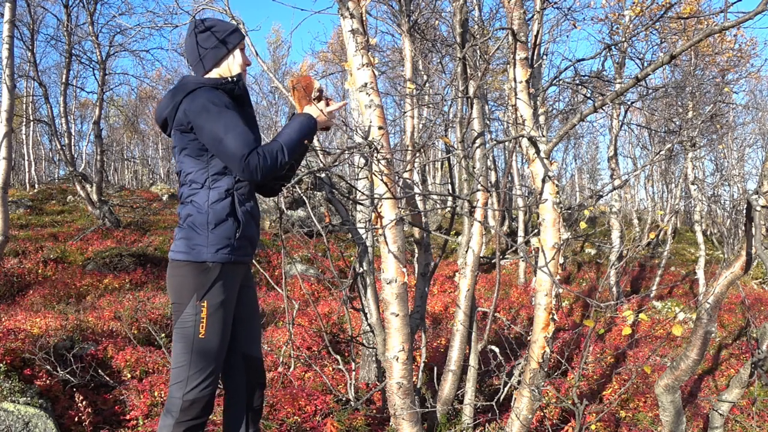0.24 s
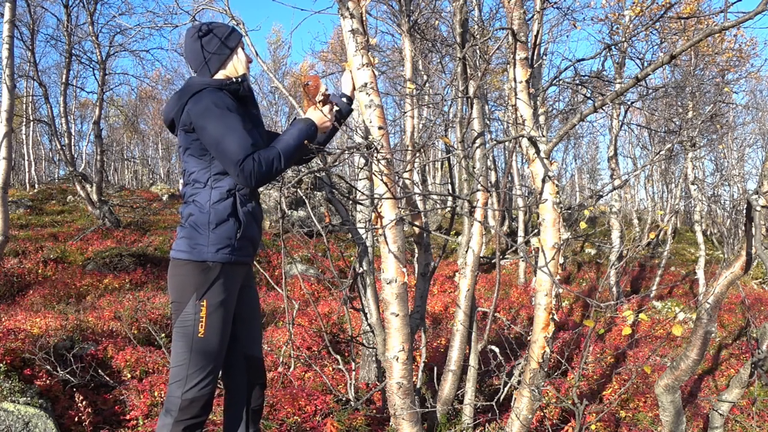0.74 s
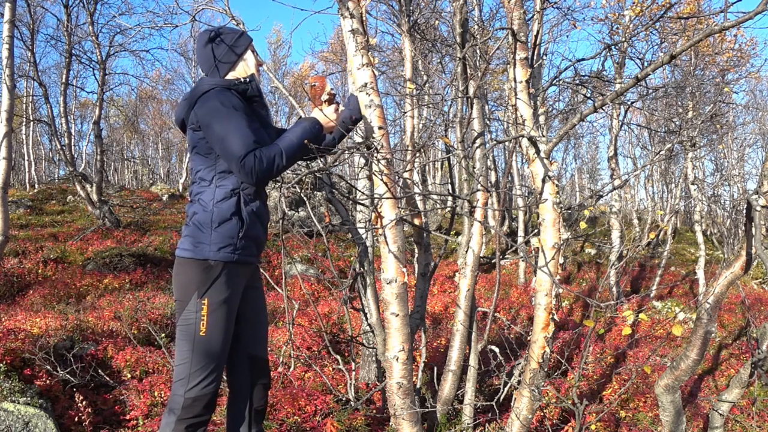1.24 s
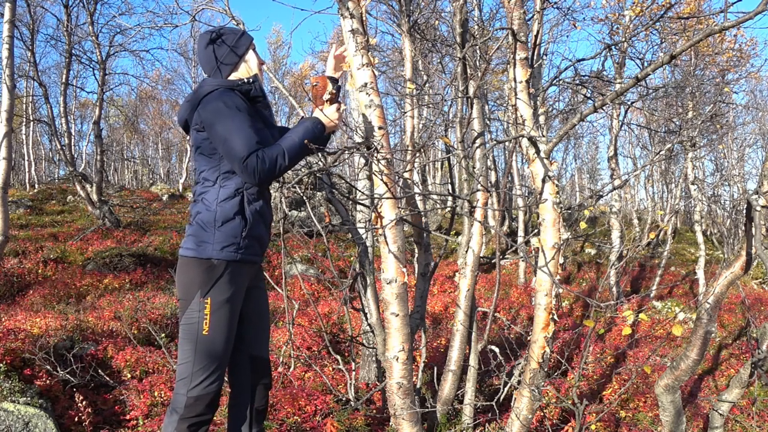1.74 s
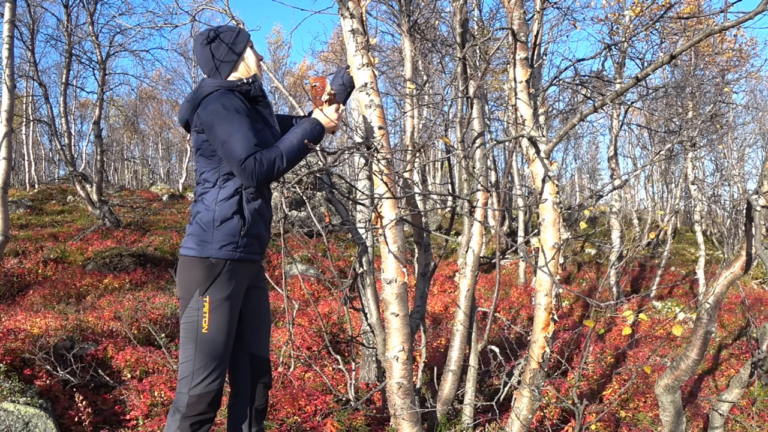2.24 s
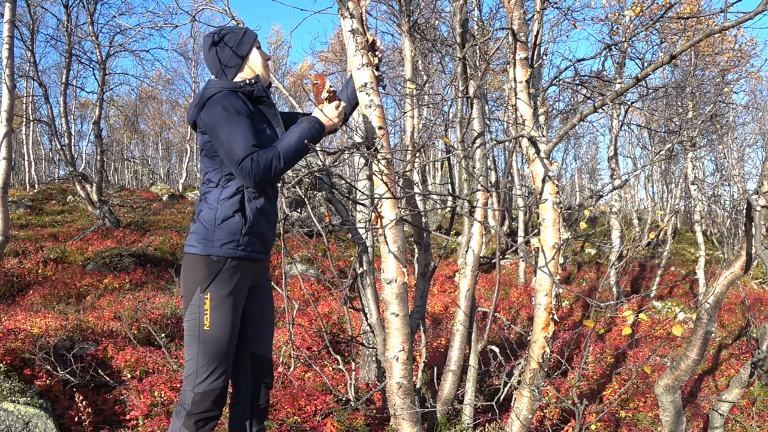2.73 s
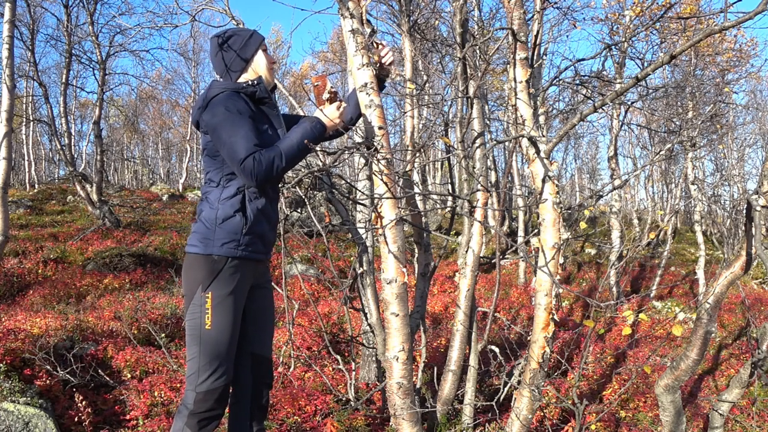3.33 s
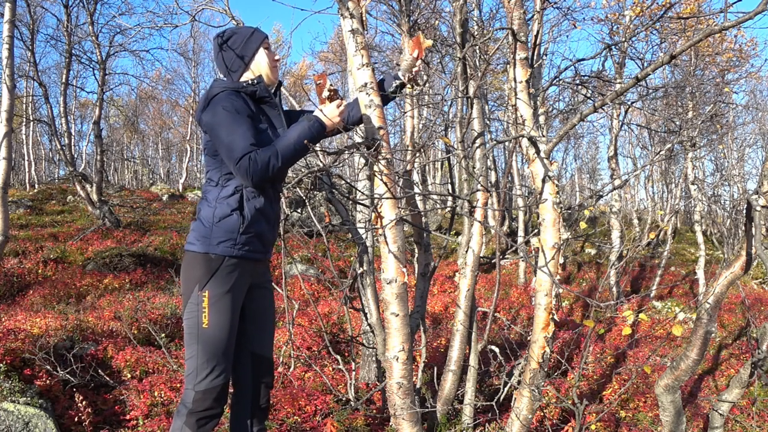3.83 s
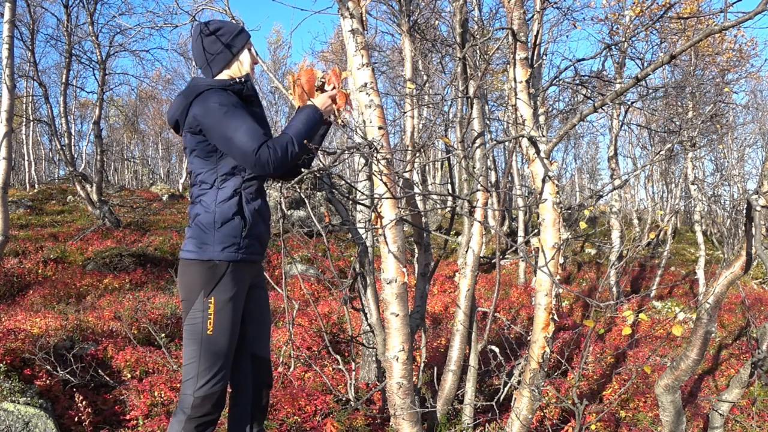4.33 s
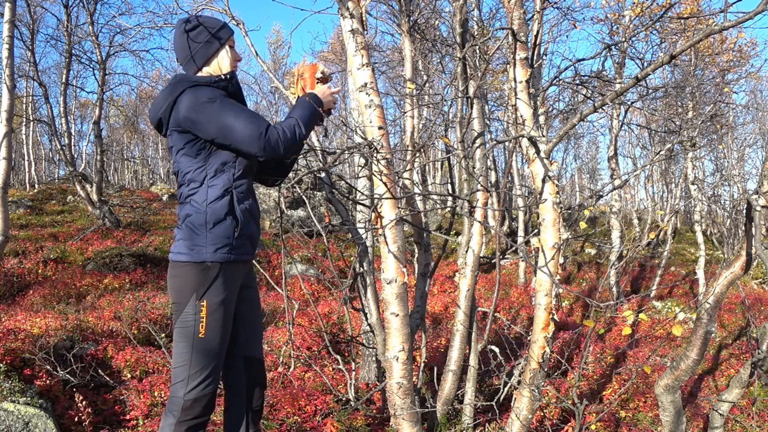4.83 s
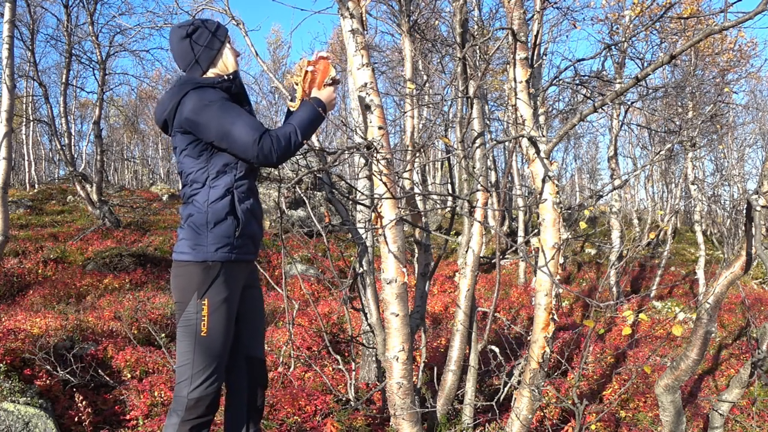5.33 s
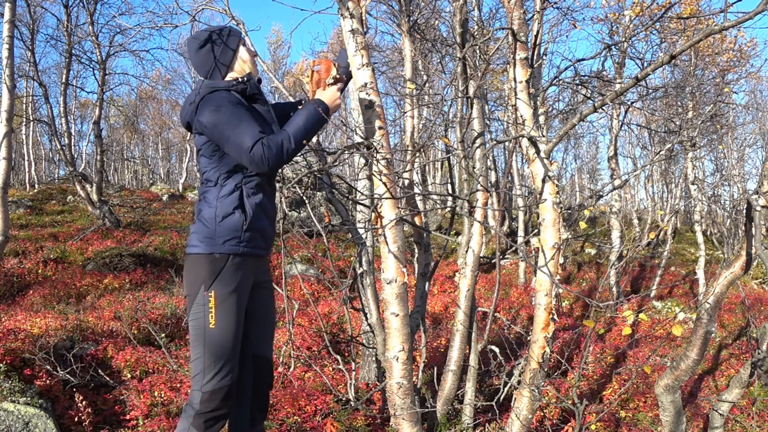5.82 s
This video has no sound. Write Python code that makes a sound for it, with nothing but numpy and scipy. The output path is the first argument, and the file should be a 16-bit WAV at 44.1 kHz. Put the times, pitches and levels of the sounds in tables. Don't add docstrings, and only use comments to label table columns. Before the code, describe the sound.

Brittle snaps and short tearing rips of thin bark, with woody creaks and faint knocks, a few metres away in calm open woodland.

```python
import sys
import numpy as np
from scipy import signal
from scipy.fft import rfft, irfft, next_fast_len
from scipy.io import wavfile
from scipy.ndimage import uniform_filter1d, map_coordinates

SR = 44100
rng = np.random.default_rng(int(sys.argv[2]) if len(sys.argv) > 2 else 0)


def invert_db(level):
    return 10 ** (np.asarray(level, dtype=float) / 20)


def dump_mix(stems):
    frames = np.atleast_2d(stems).T
    limited = np.clip(frames, -1, 1)
    pcm = np.round(limited * 32767).astype(np.int16)
    wavfile.write(sys.argv[1], SR, pcm)


N = 267687

# (frequency [Hz], level [dB per Hz])
FOREST_COLOUR = [(71, -5), (120, -3.5), (157, 0), (1070, 0.5), (2070, -7), (5300, -16), (6200, -15),
                 (7000, -19), (10600, -27), (13900, -39), (15800, -37)]
# (frequency [Hz], level [dB per Hz])
RUMBLE_COLOUR = [(12, -2), (25, 0), (50, 4.5), (85, 0), (125, -12.5), (350, -100)]
# (frequency [Hz], left-right likeness [-1 to 1])
EAR_LIKENESS = [(30, 1), (85, 1), (130, 0.23), (290, 0.23), (640, -0.023), (1400, -0.47), (6800, -0.47)]
# (frequency [Hz], level [dB])
SHEET_COLOUR = [(3600, -27), (4800, -5.5), (6300, 2.5), (7600, -3), (9000, -11), (12000, -38)]
# (frequency [Hz], level [dB])
CURL_COLOUR = [(1100, -19.5), (2000, -9.5), (3200, -3), (4300, 1.5), (5000, -4.5), (6500, -54),
               (11000, -53)]
# (frequency [Hz], level [dB])
EDGE_COLOUR = [(6500, -9.5), (9000, 2.5), (10500, 6.5), (12000, -2), (13800, -3), (15500, -18),
               (16100, -38)]
# (frequency [Hz], level [dB])
TRUNK_COLOUR = [(70, -41), (200, -14.5), (650, -2), (1150, 1), (1800, -1.5), (3000, -43), (8000, -59)]
# (frequency [Hz], level [dB])
RUB_COLOUR = [(350, -21.5), (1100, 7.5), (2200, 8), (3600, 8), (9000, -107)]
# (frequency [Hz], level [dB])
SLAB_COLOUR = [(900, -35), (1500, -6), (2200, 0), (3000, -5), (4200, -40)]
# (centre [Hz], width [Hz], level [dB])
LIMB_MODES = [(1030, 980, -5.5), (675, 193, 16.5), (1140, 106, 13.5)]

# (start [s], length [s], rustle [dB], glove over the rustle [dB])
MOVES = [(0.011, 0.44, -55, -6.5), (0.226, 0.18, -48.5, -7), (0.7, 0.38, -60, -14), (1.387, 0.35, -62, -22),
         (1.887, 0.49, -60, -8.5), (2.423, 0.27, -60, -4), (2.666, 0.17, -54.5, -6.5),
         (2.786, 0.24, -55.5, -12.5), (3.027, 0.7, -58.5, -25), (3.58, 0.55, -62.5, -26),
         (4.198, 0.77, -58.5, -4.5), (4.302, 0.27, -64.5, 5.5), (4.838, 0.48, -56.5, -6.5),
         (5.003, 0.19, -51.5, -7.5), (5.11, 0.14, -57, -21), (5.45, 0.66, -66.5, -6), (5.68, 0.28, -63, -5)]
# (start [s], length [s], rustle [dB], change along the pull [dB])
RIPS = [
    (0.972, 0.15, -49.5, -15),
    (1.239, 0.19, -48.5, -17),
    (2.35, 0.12, -41.5, 2.5),
    (2.562, 0.069, -70, -10),
    (3.231, 0.15, -59, 11),
    (3.384, 0.264, -44.5, -8),
    (4.805, 0.05, -43.5, -6),
    (5.939, 0.059, -38, -23),
]

# (time [s], sheet [dB], curl over the sheet [dB])
DEEP = [(.327, -44, -2), (1.0035, -33, -3), (1.014, -34.5, -9), (1.0435, -39, 7), (1.299, -34, -3),
        (1.357, -30, -1), (2.462, -38, 2), (2.568, -34, 2.5), (2.594, -29, -6), (2.612, -30.5, -7),
        (3.076, -36, -6), (3.24, -28, -17), (3.3725, -40, 0), (3.343, -41.5, 9), (3.4255, -29.5, -1),
        (3.443, -37, 4), (3.53, -21.5, -3), (5.153, -38, 2), (5.691, -37.5, -1), (5.9735, -39, 5),
        (5.979, -33.5, 5.5), (6.0305, -50, 3)]
# (time [s], sheet [dB], curl over the sheet [dB], extra trunk [dB], extra edge [dB])
TORN = [(.054, -39, 3.5, 2, -6), (.142, -48, 8, 0, 0), (.981, -19, -7.5, -1.5, 2.5),
        (1.2526, -13.5, -4.5, 1, -2), (2.116, -32, -1, -1.5, 2), (2.379, -39, 9, 0, 3),
        (2.4017, -14.5, -8, -3, -5), (2.412, -29, 7, -6, 0), (2.432, -20, -2.5, 1.5, 2),
        (2.449, -30, -2, 5, 4), (2.476, -38, -2, 2, 5), (2.603, -29, 3.5, 0, 7),
        (3.2522, -17.5, -1, 2, 5.5), (3.391, -24, -2, 0, 1), (3.3966, -16, 2.5, -1.5, 2),
        (3.4055, -23, 2.5, 3, 0), (3.412, -27.5, 2, -4, 6), (3.494, -31.5, 2, -1, -3),
        (3.557, -33, -3, 3, 0), (3.606, -33.5, -6, 2, 1), (4.198, -37.5, 3.5, 2.5, 1),
        (5.9327, -28, 3.5, 5, -2), (5.937, -23.5, -6, -10, 0), (6.005, -36, 0, -4, 0),
        (6.0545, -23, -5, 4, 0)]
# (time [s], sheet [dB], curl over the sheet [dB])
LOOSE = [(.088, -37.5, 2), (.215, -43, -5), (.868, -39.5, -7), (.886, -43.5, -4), (1.028, -30.5, -2),
         (2.3513, -32, 0.5), (2.361, -30, 6), (2.368, -30, 2), (3.223, -31, -5), (3.4685, -26, 1.5),
         (3.52, -30, -5), (3.553, -29.5, -8), (3.787, -37, -7), (3.967, -38, 3.5), (4.01, -40, -1),
         (4.811, -35, -17), (4.82, -28.5, -11), (4.894, -33.5, -4), (4.914, -37, -3), (4.93, -31, -6),
         (4.9505, -59, 5), (5.31, -38.5, -12), (5.323, -36, -11), (5.995, -44, -8), (6.0115, -40, 2)]
# (time [s], sheet [dB], curl over the sheet [dB])
FIBRES = [(.169, -49, 9), (.318, -49.5, 12), (1.202, -40, -8), (1.488, -48, -21), (1.563, -38.5, -2),
          (1.603, -42.5, -5), (1.9265, -60.5, 18.5), (2.018, -41.5, -4.5), (2.07, -47.5, 4),
          (2.165, -46, 5.5), (2.216, -43, 6), (2.54, -41, 0), (2.7345, -45, 3), (2.755, -42.5, -2),
          (2.903, -48, 2), (2.976, -39.5, -4.5), (3.016, -43, 1), (3.16, -52, 12), (3.186, -41, -6),
          (3.839, -45, 3), (3.9345, -46, 6), (4.179, -43, -4), (4.221, -47, 9), (4.364, -56, 0),
          (4.475, -47, -3), (5.1, -44, 4), (5.238, -45, 2.5), (5.4915, -46.5, -4), (5.706, -54, 14),
          (5.764, -59.5, 18)]
# (time [s], sheet [dB], curl over the sheet [dB], extra trunk [dB], extra edge [dB])
BRITTLE = [(.372, -34.5, -18, 2, 0), (2.4165, -28, 2, 12, 3), (2.4215, -27, 3.5, 3, 7),
           (2.4415, -27, 0, 3, 1), (2.5764, -23.5, -7, -6, -3), (3.4655, -28, -8, 4, 3),
           (3.816, -34.5, -1, -11, 2), (3.8225, -34.5, 1, -7, 3), (5.9493, -28, -2, 0, 8),
           (5.8215, -42, 0, 0, 3), (5.8326, -21.5, -2.5, -3, -5), (5.8626, -30, 2, -2, 8),
           (6.0625, -18.5, -6, 6, -4)]
# (time [s], sheet [dB], curl over the sheet [dB])
TOUGH = [(.221, -35.5, -2), (.288, -43, .6), (.42, -52, 1), (.933, -37.5, -1.5), (1.323, -25, -3),
         (1.352, -31, -0.5), (1.81, -51, 5), (1.848, -47.5, -2), (2.101, -37, -1), (2.895, -39.5, -10),
         (3.232, -21, -3), (3.579, -37.5, 2), (3.597, -29.5, -2.5), (3.953, -33.5, 1), (4.823, -32, -18),
         (4.83, -41, -12), (6.025, -31.5, -0.5), (4.003, -36, 4), (4.474, -38, -4), (4.641, -36, -1),
         (4.799, -33, -1.5), (4.887, -37, 0), (5.049, -39, 0.5), (5.088, -39, -0.5), (5.178, -55, -8)]
# (time [s], sheet [dB], curl over the sheet [dB], extra trunk [dB], extra edge [dB])
SPLINTERS = [
    (3.041, -35.5, -2.5, 0, -1),
    (3.311, -33.5, 7, 2, -1),
    (3.722, -35.5, -1, 1, -7),
]
# (time [s], sheet [dB], curl over the sheet [dB])
SCUFFS = [(2.676, -51, -1), (4.36, -46.5, -2), (4.41, -47, -3), (4.452, -43, 0.5), (4.508, -47.5, 7),
          (5.148, -52, 9)]
# (time [s], sheet [dB], curl over the sheet [dB])
THREADS = [(.008, -49, 3), (.455, -55.5, 6), (1.069, -47, -2), (2.289, -48, 7.5), (2.304, -56, 6),
           (2.319, -50, -9), (2.437, -37, -4), (3.109, -53, 3), (3.123, -55, -6), (3.133, -53, 0),
           (3.149, -51, -10), (3.508, -39, -9), (3.561, -38, 0), (3.616, -36.5, -10), (3.709, -55, 1),
           (3.769, -43.5, -13), (3.851, -42, -2), (4.393, -56, -4), (4.585, -54, -9), (5.51, -45, -14),
           (5.617, -49, 3), (5.177, -44, -9), (5.941, -39, -4), (5.953, -41, -2), (5.963, -42, 9),
           (5.992, -39, 6), (6.058, -28, -2)]
# (time [s], sheet [dB], curl over the sheet [dB], extra trunk [dB], extra edge [dB])
SHARDS = [(.666, -48.5, -14, 0, 3.5), (3.2285, -28.5, -4, -2, -5), (3.297, -41, -4, 0, 0),
          (3.3255, -25, -3.5, 1, -0.5), (4.894, -40, -7, -4, 2), (4.974, -45, 1.5, 0, -2),
          (5.937, -32, 1, -1, -4), (6.054, -29, -14, 0, -1)]
# (time [s], sheet [dB], curl over the sheet [dB])
TICKS = [(.215, -43, 3), (.3045, -43, -6), (.3855, -44, -12), (.388, -45, -12), (.8823, -44, -5),
         (.9305, -45, -2), (.9865, -38, -13), (.9965, -42, 0), (1.06, -45, -12), (1.121, -48, 0),
         (1.2485, -40, -3), (1.2575, -27, 0), (1.284, -39, -5), (1.344, -49, -2), (2.106, -46, -5),
         (2.387, -38, -3), (2.4045, -23, -3), (2.4085, -30, -3), (2.49, -46, -5), (2.632, -43, -14),
         (2.917, -44.5, 4), (2.952, -45, -3), (3.215, -48, -6), (3.281, -48, -6), (3.355, -48, -4),
         (3.4015, -23.5, -7), (3.438, -36, -5), (3.479, -37, 0), (3.5235, -37, -8), (3.5455, -39, -6),
         (3.812, -45, -4), (3.833, -41, 3), (3.9895, -45, -2), (4.4995, -45.5, 0), (4.8265, -28.5, -14),
         (4.838, -37, -10), (4.844, -42, -8), (4.882, -49, -5), (4.982, -43, -3), (5.0395, -52, -4),
         (5.139, -42, -4), (5.158, -42, -4), (5.17, -50, -4), (5.967, -45, 0), (6.0315, -35, -8)]
# (its table, trunk over the sheet [dB], edge over the sheet [dB],
# toughness [-1 brittle, 0 plain, 1 tough])
KINDS = [(DEEP, -7, -10, 0), (TORN, -14.5, -12, 0), (LOOSE, -34, -7, 0), (FIBRES, -12, -6, 0),
         (BRITTLE, -16, -20, -1), (TOUGH, -15, -11.5, 1), (SPLINTERS, -4, -6, -1), (SCUFFS, 2.8, -11, 1),
         (THREADS, -20, -7, 0), (SHARDS, -13.5, -0.91, -1), (TICKS, -21, -11.5, -1)]

# (time [s], level [dB])
SLABS = [(.143, -41), (.089, -47), (.17, -42), (0.2225, -34), (.288, -43), (.318, -47), (.933, -45),
         (1.349, -49), (2.111, -47), (2.5945, -38.5), (4.451, -44), (5.1, -41), (5.692, -48), (5.862, -54),
         (5.979, -51), (1.046, -37.5), (1.254, -30.5), (2.423, -27), (3.041, -36), (3.161, -47),
         (3.251, -37.5), (5.934, -36)]
# (time [s], jerk [dB], low mode [dB], high mode [dB])
SLIPS = [(0.692, -43, -54, -58), (0.706, -45, -59, -59), (0.721, -42, -50, -56), (0.743, -35, -51, -54),
         (0.765, -30, -52, -46), (0.785, -26.5, -54, -50), (0.797, -36, -48, -51), (0.827, -26.5, -45, -53),
         (0.835, -34, -58, -49), (0.846, -35, -47, -49), (0.86, -48, -58, -56), (0.876, -41, -45, -54),
         (0.9, -37, -42, -37), (0.96, -45, -55, -60), (0.965, -38, -52, -57), (1.067, -43, -46.5, -53),
         (1.073, -42, -53, -53), (1.109, -39, -62, -46), (1.112, -34, -45, -46), (1.133, -38, -48, -53),
         (1.152, -42, -48, -48), (1.179, -29, -44, -44), (1.228, -29, -39.5, -39), (1.239, -45, -46, -54),
         (1.295, -35, -41.5, -46), (1.371, -41, -44, -51), (1.418, -39, -56, -51), (1.427, -43, -49, -41),
         (1.455, -52, -57, -55), (1.475, -46, -49.5, -39.5), (1.517, -48, -49, -55), (1.524, -42, -51, -39),
         (1.602, -34, -46.5, -37.5), (1.61, -43, -50, -55), (1.636, -36, -50, -40.5),
         (1.684, -35, -48.5, -42.5), (1.733, -45, -63, -50), (1.741, -47, -64, -49), (1.789, -46, -52, -61),
         (2.204, -40, -56, -57), (2.238, -35, -52, -51), (2.251, -35, -49, -53), (2.28, -29, -50, -50),
         (2.293, -31.5, -52, -51), (2.311, -42, -57, -52)]
# (time [s], jerk [dB], low mode [dB], high mode [dB])
REBOUND = [(3.231, -38, -56, -39), (3.495, -44, -51, -46), (3.531, -35, -45, -40), (3.541, -40, -58, -34),
           (3.564, -43, -56, -48), (3.579, -40, -61, -38), (3.595, -45, -60, -40), (5.832, -42, -52.5, -57),
           (6.026, -43, -55, -51), (6.031, -34, -54, -54), (6.061, -24.5, -53, -39)]
# (time [s], pitch [Hz], level [dB], time to fall 60 dB [s])
BUMPS = [
    (3.251, 282, -40, .04),
    (3.402, 130, -49, .07),
    (3.44, 420, -45, 0.049),
    (3.484, 198, -46.5, 0.054),
    (3.611, 75, -43, 0.088),
    (6.057, 250, -57, .04),
]


def unit(x):
    return x / np.sqrt(np.mean(x ** 2) + 1e-20)


def along(points, hz):
    f, value = np.transpose(points)
    return np.interp(np.log(hz + 1), np.log(f + 1), value)


def wobble(rate):
    knots = rng.standard_normal(int(N * rate / SR) + 4)
    return map_coordinates(knots, [np.arange(N) * rate / SR])


def filtered(x, response):
    size = next_fast_len(N + 8192)
    hz = np.fft.rfftfreq(size, 1 / SR)
    return irfft(rfft(x, size) * response(hz), size)[..., :N]


def struck(x, colour):
    log_gain = np.log(invert_db(along(colour, np.fft.rfftfreq(2048, 1 / SR))))
    cepstrum = irfft(log_gain)
    cepstrum[1:1024] *= 2
    cepstrum[1025:] = 0
    ring = irfft(np.exp(rfft(cepstrum)))
    return signal.fftconvolve(x, ring / np.linalg.norm(ring))[:N]


def rush(colour, patchy_db):
    z = signal.stft(rng.standard_normal((2, N)), nperseg=512)[2]
    patches = uniform_filter1d(rng.standard_normal(z.shape[1:]), size=6, axis=0)
    patches = uniform_filter1d(patches, size=14, axis=1)
    pair = signal.istft(z * invert_db(patchy_db * unit(patches)), nperseg=512)[1][:, :N]

    def middle_and_side(hz):
        angle = np.arccos(np.clip(along(EAR_LIKENESS, hz), -1, 1)) / 2
        return invert_db(along(colour, hz)) * [np.cos(angle), np.sin(angle)]

    mid, side = filtered(pair, middle_and_side)
    return unit(np.array([mid + side, mid - side]))


def forest_air():
    return invert_db(-57.5 + 0.051 * wobble(4.0)) * rush(FOREST_COLOUR, patchy_db=1.15)


def far_rumble():
    drone = unit(np.tanh(0.37 * rush(RUMBLE_COLOUR, patchy_db=-1.0)))
    return invert_db(-59.5) * drone * invert_db([[-.25], [.25]])


def gestures(start, length, db, fade_db, edge_s):
    into = np.arange(N) / SR - start[:, None]
    length = length[:, None]
    shape = np.clip(np.minimum(into, length - into) / edge_s, 0, 1)
    level_db = db[:, None] + fade_db[:, None] * np.clip(into / length, 0, 1)
    return ((shape * invert_db(level_db)) ** 2).sum(axis=0)


def crackle(clump_db, spike_db, count):
    draw = rng.random((count, 2))
    place = (draw[:, 0] * N).astype(int)
    ticks = np.bincount(place, invert_db(spike_db * draw[:, 1] ** 3), N)
    swell = 1 + 0.44 * signal.lfilter([1], [1, -np.exp(-1 / (SR * 0.0015))], ticks)
    return unit(swell * invert_db(clump_db * wobble(55)))


def rustle():
    start, length, db, glove_db = np.transpose(MOVES)
    no_fade, move_edge_s = 0 * start, 0.074
    idle_db, idle_rub_db, rip_rub_db = -65.5, -85, -10.5
    rips = gestures(*np.transpose(RIPS), edge_s=0.011)
    paper_moves = gestures(start, length, db, no_fade, move_edge_s)
    rub_moves = gestures(start, length, db + glove_db, no_fade, move_edge_s)
    paper_gain = np.sqrt(invert_db(idle_db) ** 2 + rips + paper_moves)
    rub_gain = np.sqrt(invert_db(idle_rub_db) ** 2 + invert_db(rip_rub_db) ** 2 * rips + rub_moves)

    shared = crackle(clump_db=1.2, spike_db=9.5, count=2200)
    grain = []
    for _ in range(3):
        own = crackle(clump_db=1, spike_db=9, count=1200)
        grain.append(unit(shared * own) * rng.standard_normal(N))
    paper = struck(grain[0], SHEET_COLOUR)
    paper = paper + invert_db(-4.0 + 0.73 * wobble(13)) * struck(grain[1], CURL_COLOUR)
    paper = paper + invert_db(-9.0 + 1.1 * wobble(14)) * struck(grain[2], EDGE_COLOUR)
    friction = crackle(clump_db=1.8, spike_db=11, count=1400) * rng.standard_normal(N)
    rub = invert_db(0.22 * wobble(9.2)) * struck(friction, RUB_COLOUR)
    return invert_db(-2.0) * paper_gain * paper + rub_gain * rub


def bursts(times, dbs, tough, lumps, crack_t60, fray_t60, fray_db):
    lead = 600
    t = (np.arange(lumps.shape[1]) - lead) / SR
    after = np.maximum(t, 0)
    brittle, slow = tough[:, None] < 0, tough[:, None] > 0

    rise = 1 - np.exp(-after / np.where(brittle, .00015, .0005))
    crack = invert_db(2.0 * brittle - 8.0 * slow - 60 * after / crack_t60) * rise
    strain_s = np.where(slow, .005, np.where(brittle, .0003, .0006))
    strain = np.exp(np.minimum(t, 0) / strain_s)
    fray_fall = 60 * after / (fray_t60 * np.where(brittle, .7, 1))
    fray = invert_db(fray_db - 2.2 * brittle + 1.8 * slow - fray_fall) * strain * lumps
    shape = crack + fray

    noise = rng.standard_normal(lumps.shape)
    noise[:, lead + 14] = (3 + 1.5 * brittle[:, 0]) * np.sign(noise[:, 0])
    wanted = np.linalg.norm(shape, axis=1, keepdims=True)
    noise *= wanted / np.linalg.norm(shape * noise, axis=1, keepdims=True)
    sound = invert_db(dbs - 0.15)[:, None] * shape * noise
    at = np.round(times * SR).astype(int)[:, None] + np.arange(len(t))
    return np.bincount(at.ravel(), sound.ravel(), N + len(t))[lead:N + lead]


def snaps():
    rows = []
    for table, *kind in KINDS:
        for row in table:
            rows.append((*(*row, 0, 0)[:5], *kind))
    s, db, curl_db, own_trunk, own_edge, trunk_db, edge_db, tough = np.transpose(rows)
    scatter_db = 1.16 * rng.standard_normal((2, len(s)))
    trunk_db = trunk_db + own_trunk + scatter_db[0]
    edge_db = edge_db + own_edge + scatter_db[1]
    lumps = uniform_filter1d(rng.standard_normal((len(s), SR // 14)), size=45, axis=1)
    lumps = invert_db(2.6 * unit(lumps))

    sheet = bursts(s, db + 1, tough, lumps, crack_t60=0.0059, fray_t60=0.06, fray_db=-14.0)
    curl = bursts(s, db + curl_db, tough, lumps, crack_t60=0.0046, fray_t60=0.06, fray_db=-13.5)
    wood = bursts(s, db + trunk_db - 0.6, tough, lumps, crack_t60=0.0055, fray_t60=0.083, fray_db=-10.5)
    edge = bursts(s, db + edge_db, tough, lumps, crack_t60=0.0046, fray_t60=0.07, fray_db=-13)
    strip = struck(sheet, SHEET_COLOUR) + struck(curl, CURL_COLOUR)
    return strip + struck(wood, TRUNK_COLOUR) + struck(edge, EDGE_COLOUR)


def slabs():
    s, db = np.transpose(SLABS)
    lumps = invert_db(3.4 * rng.standard_normal((len(s), SR // 20)))
    cracks = bursts(s, db, 0 * s, lumps, crack_t60=0.0093, fray_t60=0.063, fray_db=-15.0)
    return struck(cracks, SLAB_COLOUR)


def creak():
    s, *grip_db = np.transpose(SLIPS + REBOUND)
    late, size = rng.standard_normal((2, len(s)))
    afterslip_s, afterslip_db = 0.003 * np.exp(.3 * late), -8.5 + 2.5 * size
    s = np.r_[s, s + afterslip_s] + 0.001477
    grip_db = np.c_[grip_db, grip_db + afterslip_db]
    at = np.round(s * SR).astype(int)
    jerks = np.array([np.bincount(at, invert_db(db + 22.0), N) for db in grip_db])

    def limb_response(f):
        modes = []
        for centre, width, db in LIMB_MODES:
            damping = 1j * f * width
            modes.append(invert_db(db) * damping / (centre * centre - f * f + damping))
        return np.array(modes) / (1 + 1j * f / 3500) ** 3

    return filtered(jerks, limb_response).sum(axis=0)


def bumps():
    s, hz, db, t60 = np.transpose(BUMPS)[:, :, None]
    t = np.maximum(np.arange(N) / SR - s, 0)
    loudness = invert_db(db - 60 * t / t60) * (1 - np.exp(-t / 0.0016))
    return (loudness * np.sin(2 * np.pi * hz * t)).sum(axis=0)


def scatter(x, t60, level_db):
    t = np.arange(SR // 4) / SR
    tail = rng.standard_normal((2, len(t))) * invert_db(-60 * t / t60) * (1 - np.exp(-t / 0.0031))
    tail = tail / np.linalg.norm(tail[0])
    return invert_db(level_db) * signal.fftconvolve(x[None], tail, axes=1)[:, :N]


def scene():
    air, low = forest_air(), far_rumble()
    bark = rustle() + snaps() + slabs()
    limb = creak() + bumps()
    near = (bark + limb) * invert_db([[.35], [-.35]])
    glint = scatter(np.gradient(np.gradient(bark)), t60=0.0065, level_db=-10.5)
    bark_tail = scatter(bark, t60=0.14, level_db=-26)
    limb_tail = scatter(limb, t60=0.098, level_db=-13.0)
    return near + glint + bark_tail + limb_tail + air + low


def band_limit(x):
    return signal.sosfilt(signal.butter(12, 16630, fs=SR, output="sos"), x)


def record(dry):
    top_hz, shelf_hz, shelf_db = 16600, 15850, -13
    mix = filtered(dry, lambda hz: (hz < top_hz) * np.where(hz < shelf_hz, 1, invert_db(shelf_db)))
    return band_limit(mix)


dry = scene()
out = record(dry)
dump_mix(out)
```